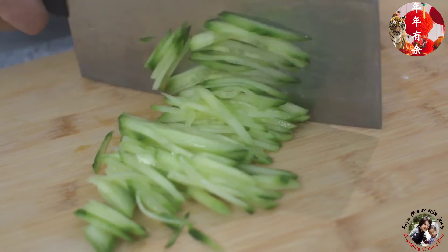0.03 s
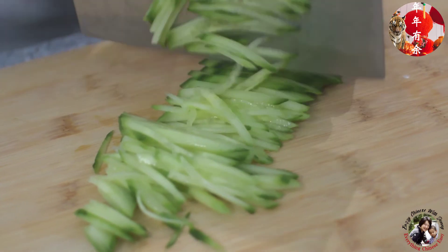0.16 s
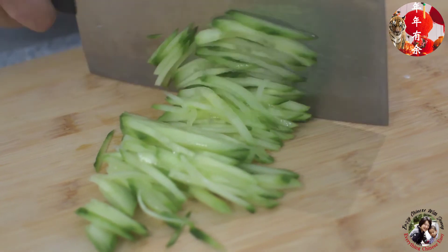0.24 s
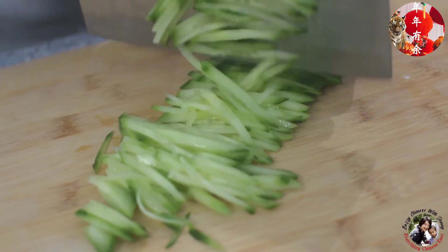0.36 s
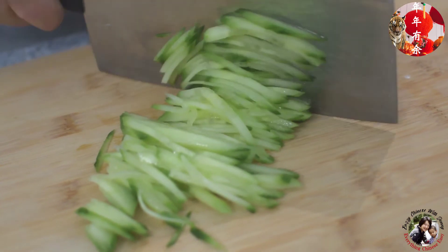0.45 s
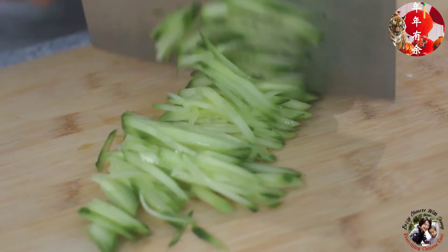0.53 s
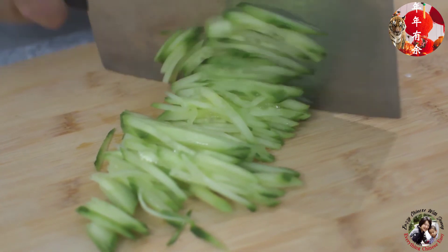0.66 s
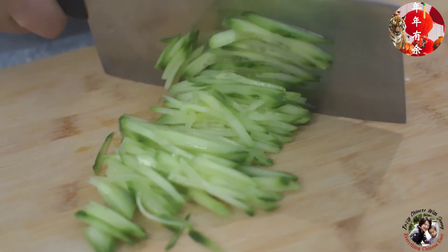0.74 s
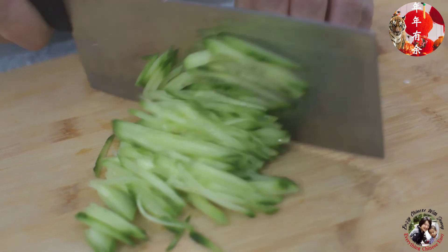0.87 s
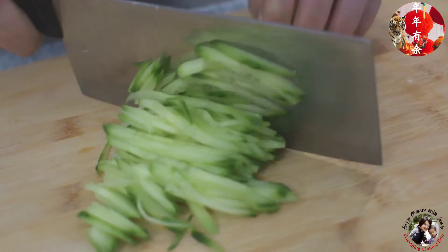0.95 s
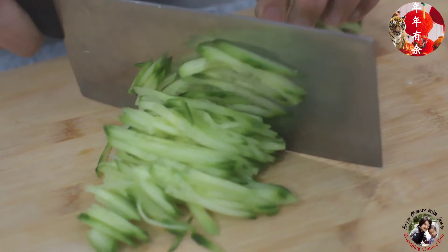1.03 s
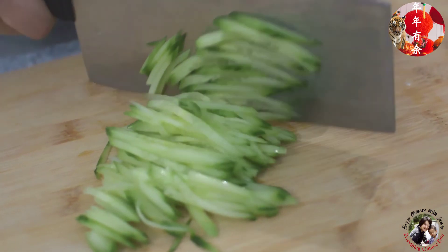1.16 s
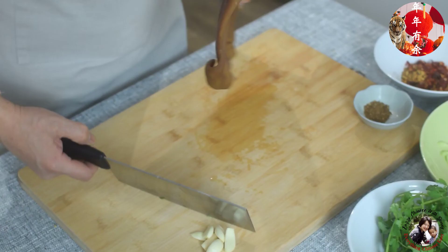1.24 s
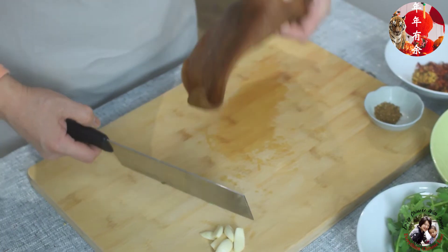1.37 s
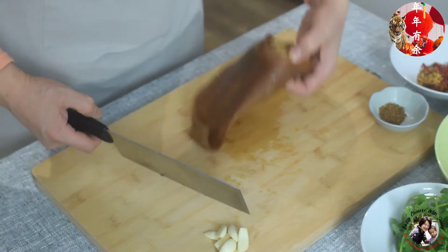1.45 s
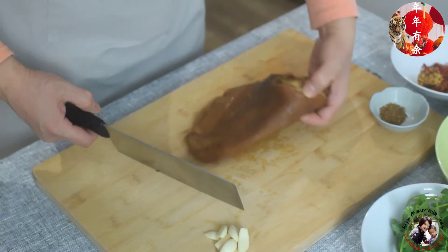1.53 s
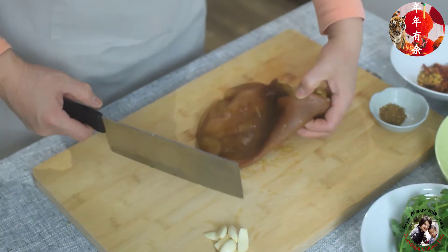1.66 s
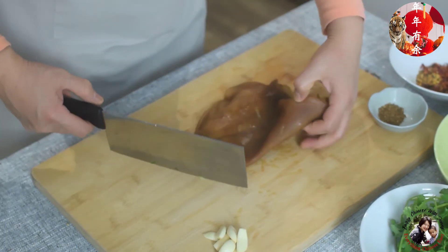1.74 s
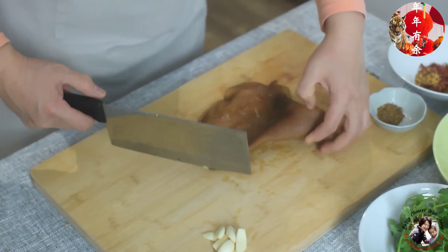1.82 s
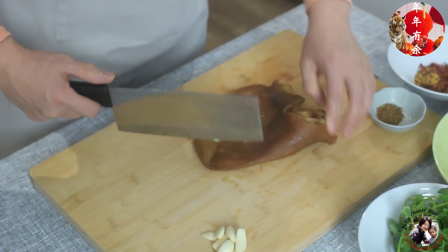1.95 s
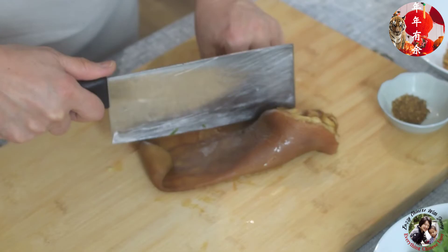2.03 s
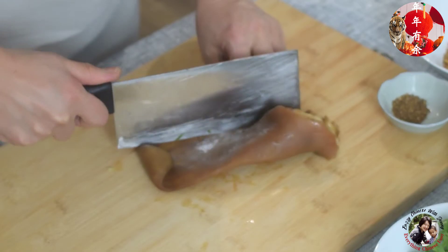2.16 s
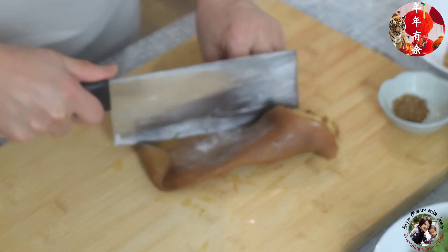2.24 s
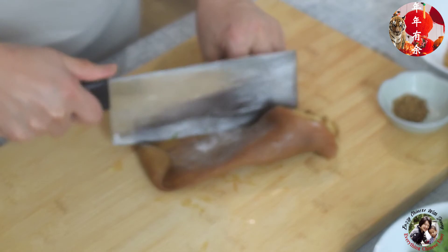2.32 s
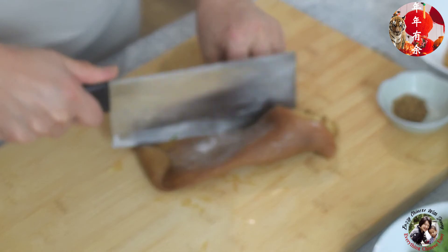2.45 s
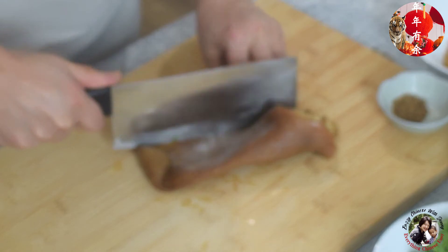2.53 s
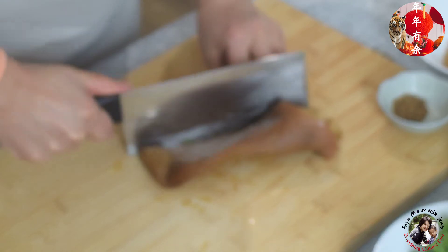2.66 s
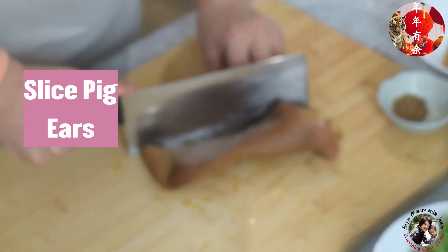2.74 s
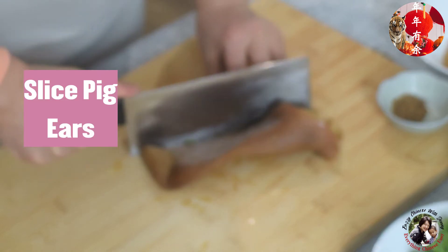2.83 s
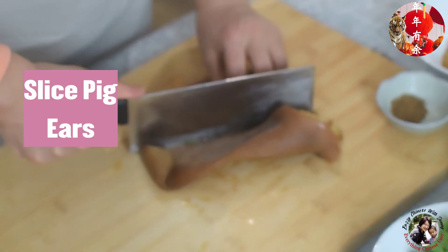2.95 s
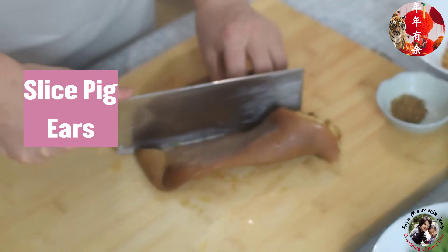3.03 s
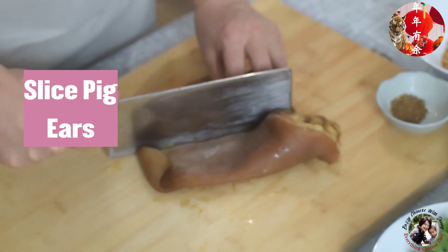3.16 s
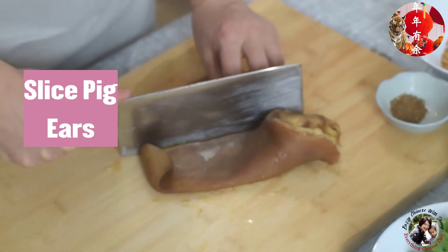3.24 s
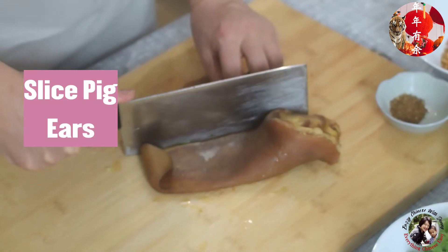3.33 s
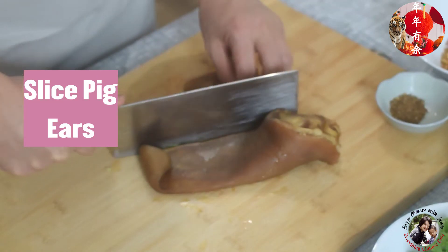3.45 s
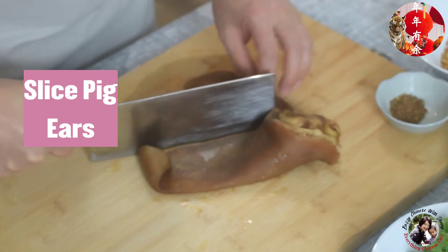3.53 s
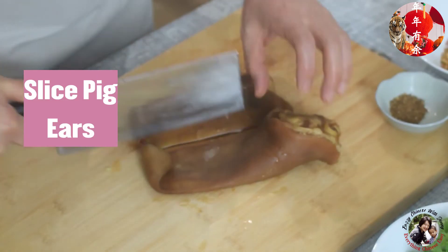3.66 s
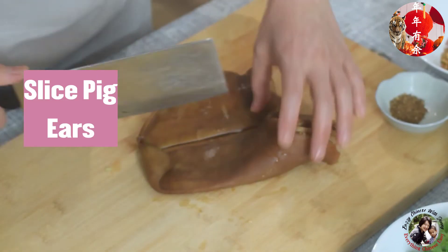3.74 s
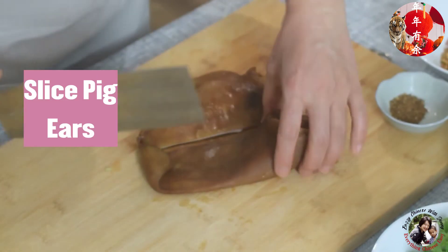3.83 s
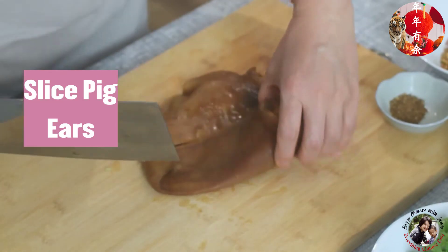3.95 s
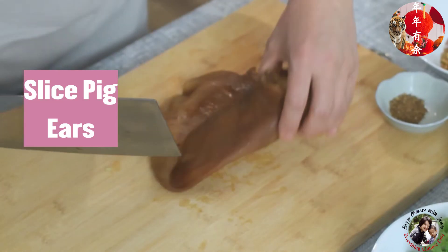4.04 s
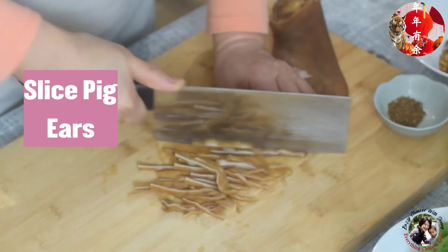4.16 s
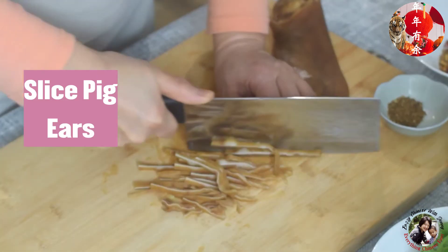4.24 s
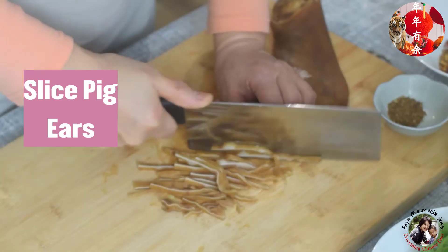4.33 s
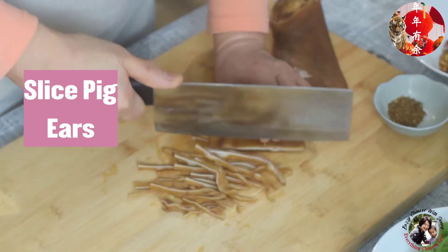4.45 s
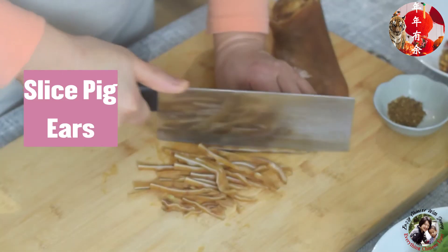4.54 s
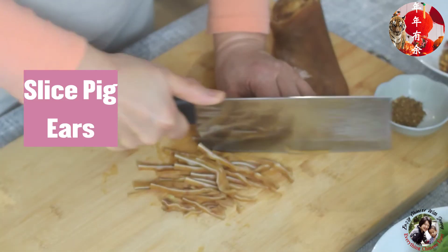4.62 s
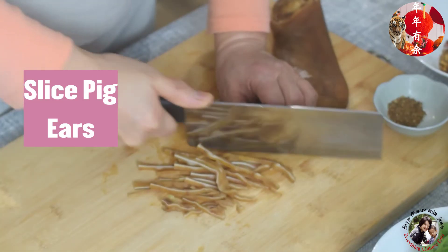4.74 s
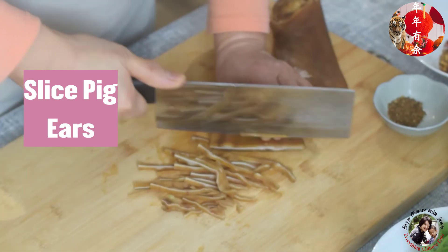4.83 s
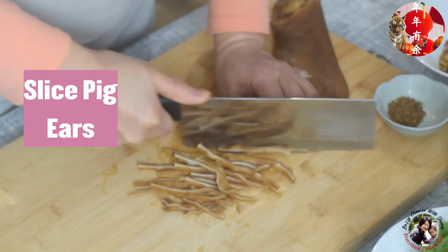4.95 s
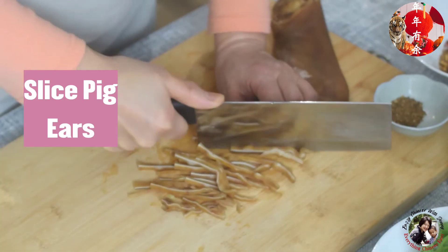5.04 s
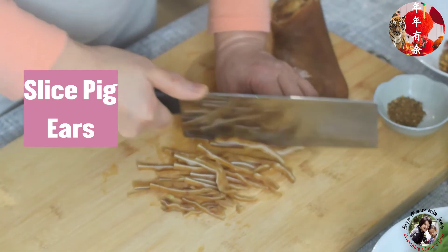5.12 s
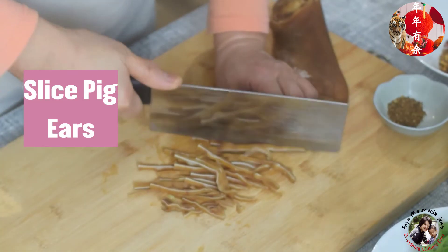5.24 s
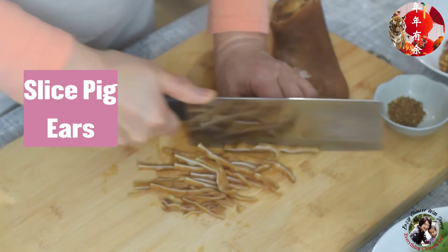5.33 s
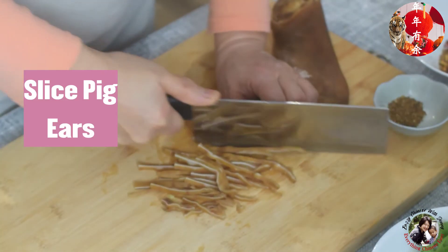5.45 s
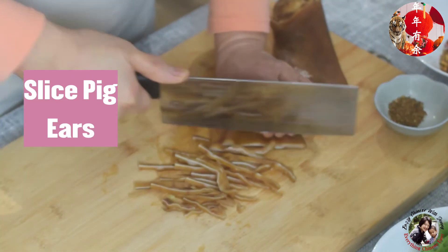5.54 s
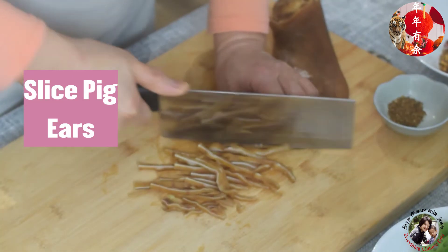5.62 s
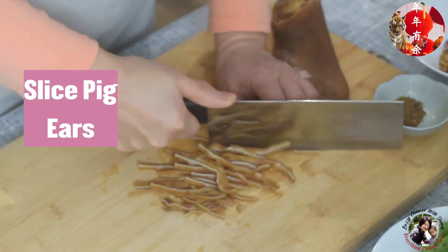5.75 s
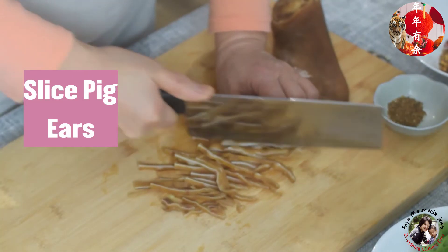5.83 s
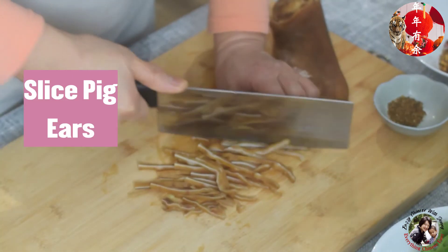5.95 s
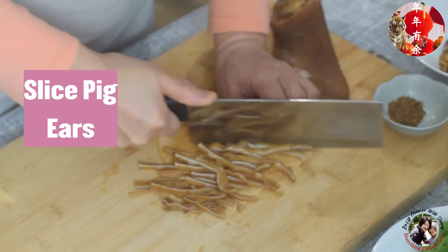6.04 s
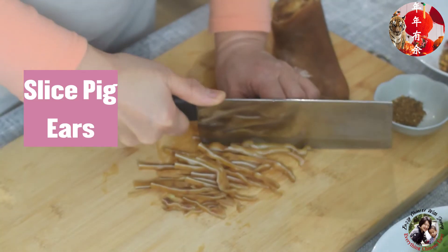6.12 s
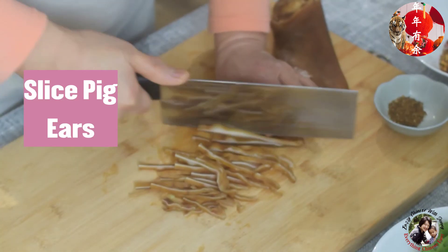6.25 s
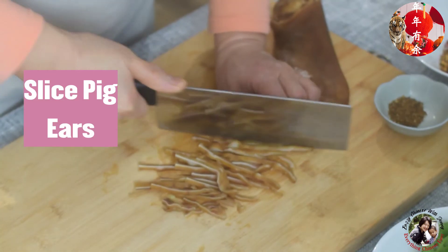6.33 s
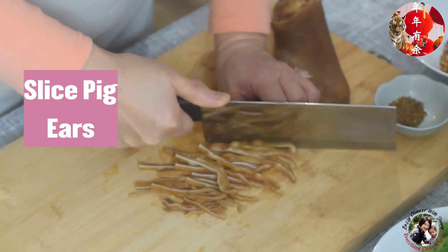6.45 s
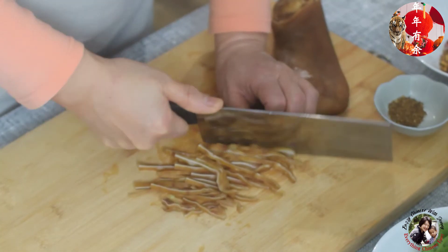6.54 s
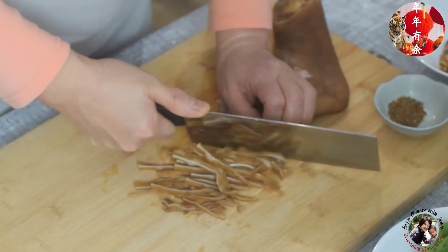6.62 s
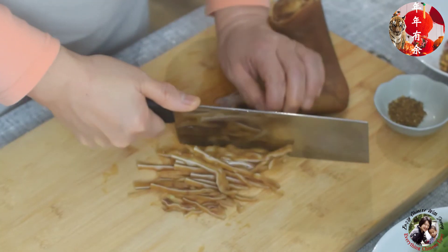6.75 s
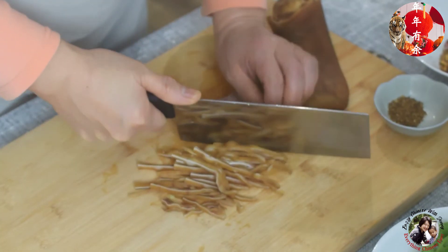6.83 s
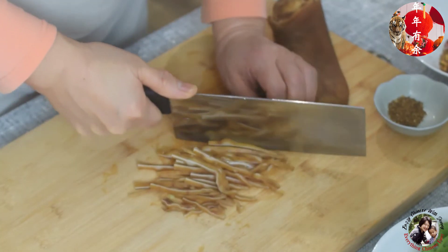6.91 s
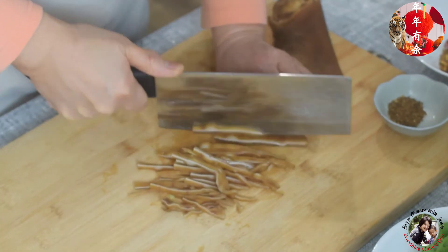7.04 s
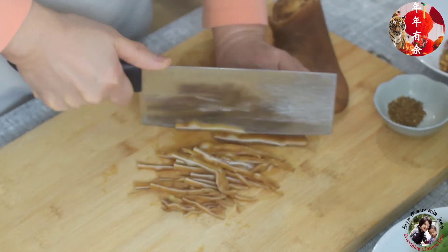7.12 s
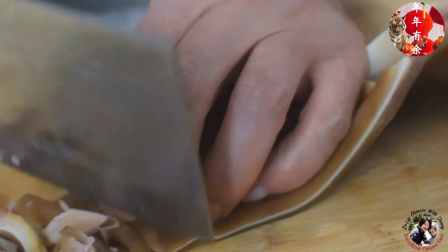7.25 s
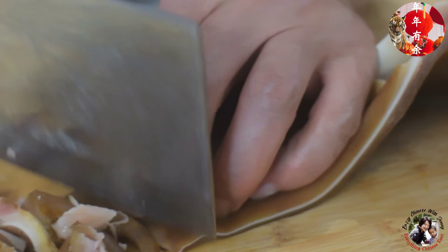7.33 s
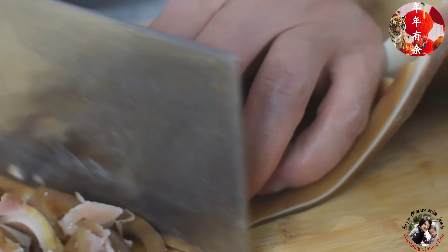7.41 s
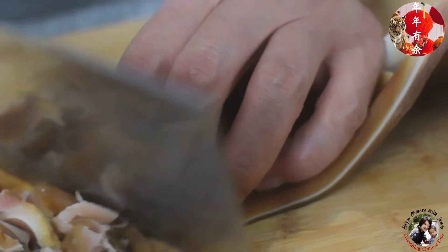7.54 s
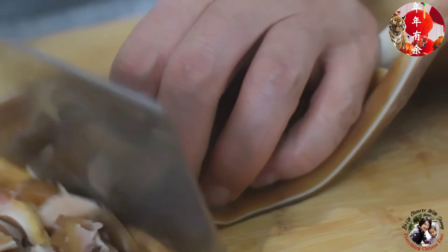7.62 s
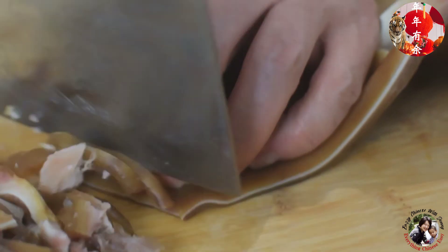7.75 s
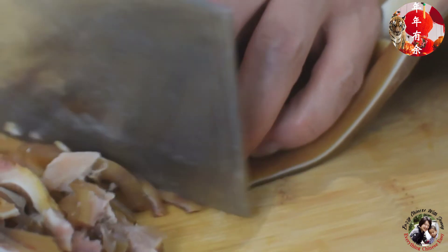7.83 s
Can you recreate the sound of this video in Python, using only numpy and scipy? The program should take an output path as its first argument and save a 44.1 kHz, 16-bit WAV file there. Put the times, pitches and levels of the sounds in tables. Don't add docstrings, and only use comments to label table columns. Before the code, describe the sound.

A small, hard-walled kitchen with about half a second of echo and a faint low hum. From 0 seconds a cleaver chops cucumber close by: hard, crunchy wooden knocks at about 0.0, 0.2, 0.43 and 0.65, the last loudest and distorting the microphone, each with a juicy crackle and short blade hiss; a soft knock follows at 0.9. The view widens at 1.24. Light taps come around 1.5 to 1.9, then a long quiet draw at 2.2 and back-and-forth gritty sawing from 2.6 to 3.3, with a harder, faintly singing wipe at 3.5. Slices through gristle strike the board at 4.2, 4.56, 4.96, 5.24, 5.65, 6.0 and 6.37, hardest at 5.24, with brief bright skids. A soft thud falls at 6.7, faint rubbing around 7.1, a firm hollow rim knock at 7.43, and tiny touches near 7.8.

```python
import sys
import numpy as np
from scipy import signal
from scipy.fft import rfft, irfft, next_fast_len
from scipy.io import wavfile
from scipy.ndimage import uniform_filter1d

SR = 44100
rng = np.random.default_rng(int(sys.argv[2]) if len(sys.argv) > 2 else 0)


def output_pcm(signal):
    pcm = np.clip(np.atleast_2d(signal).T, -1, 1) * 32767
    wavfile.write(sys.argv[1], SR, np.round(pcm).astype(np.int16))


def rack_gain(trim_db):
    fader = np.asarray(trim_db, float)
    return 10 ** (fader / 20)


N = 347508
CUT_S = 1.24

# hz, t60_s, after_chop_db, after_slice_db
KITCHEN = [(100, 0.58, -13.5, -2.5), (145, 0.29, 11, -4), (194, 0.23, 10, 0.5), (260, 0.45, 1.5, 4),
           (330, 0.5, 4, 0), (417, 0.44, 7, 4.5), (670, 0.51, -2, -5), (963, 0.48, -1, -4.5),
           (1130, 0.44, -6, -8), (1550, 0.48, -10, -15.5), (2000, 0.43, -15.5, -14),
           (2300, 0.44, -20.5, -15), (2800, 0.24, -25, -14.5), (3300, 0.3, -30, -18.5),
           (4300, 0.34, -39.5, -27.5), (8700, 0.11, -48, -33)]
# mode_hz, t60_s, level_db
STANDING_WIDE = [(141.6, 0.41, -3), (211, 0.36, -9.5), (290, 0.38, -11.5), (311, 0.3, -7.5),
                 (354, 0.41, -4.5), (418, 0.43, -3.5), (437.4, 0.58, -8), (542, 0.47, -15),
                 (600, 0.34, -11), (769, 0.59, -17.5), (874, 0.36, -10.5), (969, 0.38, -16),
                 (1060, 0.36, -17), (1193, 0.17, -22.5)]
# mode_hz, level_db, t60_s
SLICE_BOARD = [(150, -2.5, 0.28), (294, 2, 0.02), (350, 5.5, 0.1), (432, 3.5, 0.049), (580, -18, 0.031),
               (760, -4, 0.03), (850, -9, 0.03), (1010, 1.5, 0.04), (1176, -6, 0.027), (1337, -19, 0.011),
               (1780, -7.5, 0.014)]


def noise():
    return rng.standard_normal(N)


def unit(x):
    return x / np.sqrt(np.mean(x ** 2))


def band(x, lo_hz, hi_hz):
    edges_hz = [lo_hz, min(hi_hz, .45 * SR)]
    return signal.sosfilt(signal.butter(2, edges_hz, "bandpass", fs=SR, output="sos"), x)


def colour(x, points):
    hz, db = np.transpose(points)
    size = next_fast_len(N)
    f = np.maximum(np.arange(size // 2 + 1) * SR / size, 1)
    gain = rack_gain(np.interp(np.log(f), np.log(hz), db))
    return unit(irfft(rfft(x, size) * gain, size)[:N])


def add(out, s, x):
    i = max(int(s * SR), 0)
    out[i:i + len(x)] += x[:N - i]


def ring(hz, t60, seconds=.4, turn=0.):
    t = np.arange(int(seconds * SR)) / SR
    return np.sin(2 * np.pi * (hz * t + turn)) * np.exp(-np.log(1000) * t / t60)


def grit(spread_db, rate):
    happens = rng.random(N) < rate / SR
    largest = 6
    size = rack_gain(spread_db * np.minimum(rng.exponential(size=N), largest))
    return unit(happens * noise() * size + 0.064 * noise())


def mottle(x):
    size, depth_db, width_hz, hold_s = 256, 2.2, 400, .015
    cells = signal.stft(x, nperseg=size)[2]
    field = rng.standard_normal(cells.shape)
    field = uniform_filter1d(field, int(width_hz * size / SR), axis=0)
    field = uniform_filter1d(field, int(2 * hold_s * SR / size), axis=1)
    return unit(signal.istft(cells * rack_gain(depth_db * unit(field)), nperseg=size)[1][:N])


def hum():
    # hz, level_db per Hz
    spectrum = [(12, -40.5), (20, -12.5), (53, -2.5), (120, -3.5), (234, -3.5), (301, -9.5), (328, -1.5),
                (367, -9.5), (410, -7), (446, -8.5), (897, -11), (2390, -21), (12800, -35), (16000, -44.5)]
    waver = unit(uniform_filter1d(noise(), SR // 8))
    air = rack_gain(-59.5 + .7 * waver) * colour(noise(), spectrum)
    treble_share = .65
    dull = air - (1 - treble_share) * band(air, 2484, SR / 2)
    return np.where(np.arange(N) < CUT_S * SR, dull, air)


def kitchen(db, swing=0):
    seconds, gap_s, early_db = .6, 0.0032, 6.0
    t = np.arange(int(seconds * SR)) / SR
    hz, t60 = np.transpose(KITCHEN)[:2]
    scatter = rfft(rng.standard_normal(len(t)))
    f = np.log(np.maximum(np.arange(len(scatter)) * SR / len(t), 1))
    centres = np.log(np.r_[hz[0] / 2, hz, hz[-1] * 2])
    echo = 0
    for own, gain_db, long in zip(np.eye(len(hz)), db, t60):
        part = irfft(scatter * np.interp(f, centres, np.r_[0, own, 0]), len(t))
        echo = echo + rack_gain(gain_db) * part * np.exp(-np.log(1000) * t / long)
    arrival = np.clip(t / gap_s - .5, 0, 1) * rack_gain(early_db * np.exp(-t / 0.0061))
    return echo * arrival + swing * np.clip(t / 0.026, 0, 1)


def presses():
    # start_s, peak_db, counter_db, board_hz
    loads = [
        (2.703, -35.5, -31, 139),
        (4.137, -42, -4, 139),
        (4.498, -35.5, -7, 140),
        (4.879, -36.5, -5, 139),
        (4.922, -30, -13, 138.7),
        (5.594, -38, -6, 141),
        (5.938, -30, -8, 140),
        (6.281, -47.5, -27, 141),
        (7.359, -34, -1, 136),
        (7.81, -33, -1, 134),
    ]
    out = np.zeros(N)
    rise = 1 - np.exp(-np.arange(int(.4 * SR)) / (0.006 * SR))
    for s, db, counter_db, hz in loads:
        counter = ring(54.0, 0.25, turn=0.14) + rack_gain(-9.0) * ring(85.0, 0.08)
        add(out, s, -rack_gain(db - 1) * rise * (ring(hz, 0.19) + rack_gain(counter_db) * counter))
    return out


def ticks():
    # start_s, peak_db, centre_hz
    touches = [(0.1526, -39, 6000), (0.193, -29, 2200), (0.677, -32, 4000), (0.682, -32, 4000),
               (0.7802, -46, 3030), (0.797, -41.5, 5000), (0.874, -43, 5000), (0.9623, -43.5, 4000),
               (1.4, -47.5, 2500), (1.5457, -48, 1800), (1.6687, -50, 5056), (1.8397, -39, 1500),
               (2.6282, -36, 3200), (2.6947, -41, 3310), (2.739, -45, 3000), (2.7475, -31, 2800),
               (2.748, -31, 6000), (2.878, -45, 2100), (2.8898, -38, 5500), (2.907, -42, 3500),
               (2.92, -39, 4000), (2.9995, -33, 3300), (3.0046, -45, 6000), (3.179, -48, 1700),
               (3.408, -46, 1700), (3.9237, -49, 6740), (4.1244, -52, 3000), (4.1667, -43, 4320),
               (4.1782, -38, 2300), (4.3244, -46, 5800), (4.4696, -41, 3000), (4.5413, -35.5, 5000),
               (4.788, -40, 2500), (4.9135, -43, 1800), (4.928, -43.5, 3000), (5.137, -44, 2000),
               (5.2714, -34.5, 5500), (5.594, -34, 900), (5.6318, -37.5, 6000), (5.8886, -33, 2500),
               (5.987, -42, 5100), (6.003, -30, 2000), (6.09, -48.5, 11000), (6.1094, -53, 3080),
               (6.1594, -43, 3450), (6.242, -42, 2000), (6.2874, -50, 2000), (6.3195, -38, 11000),
               (6.357, -40, 2600), (6.4245, -36, 1600), (6.6144, -46, 3769), (6.717, -44, 2000),
               (7.14, -42, 2400), (7.411, -37.5, 4000), (7.447, -47.5, 6120), (7.681, -56, 3300),
               (7.81, -41.5, 1000), (7.8694, -38, 4100)]
    out = np.zeros(N)
    chance = rng.standard_normal((len(touches), 500))
    fade = np.exp(-np.arange(500) / (.0025 * SR))
    for (s, db, hz), puff in zip(touches, chance):
        add(out, s, rack_gain(db - 2) * band(puff * fade, .7 * hz, 1.8 * hz))
    return out


def stroke(sound, curve, peak_s, rise_s, fall_s, db):
    rise_s, fall_s = max(rise_s, .002), max(fall_s, .002)
    first = max(int((peak_s - 2 * rise_s) * SR), 0)
    last = min(int((peak_s + 2 * fall_s) * SR), N)
    i = np.arange(first, last)
    t = i / SR - peak_s
    away = np.where(t < 0, -t / rise_s, t / fall_s)
    return np.bincount(i, sound[i] * rack_gain(db - 20 * away ** curve), N)


def sliding():
    # peak_s, rise_s, fall_s, hiss_db, rumble_over_hiss_db
    sawing = [
        (1.48, 0.013, 0.17, -61, 11),
        (1.86, 0.042, 0.084, -74, 16),
        (2.23, 0.18, 0.21, -56.5, 0),
        (2.62, 0.075, 0.036, -62.5, 5),
        (2.75, 0.1, 0.16, -57, 6),
        (2.9, 0.052, .11, -55.5, 4),
        (3.03, 0.05, 0.11, -56.5, 9),
        (3.238, 0.1, 0.066, -56.5, 10),
        (3.52, 0.14, 0.13, -51.5, 8),
    ]
    # peak_s, rise_s, fall_s, hiss_db, rub_over_hiss_db
    skids = [(.03, 0.017, 0.18, -50.5, -24.5), (.235, .01, 0.13, -49, 1), (.45, 0.0088, 0.17, -53.5, -10.5),
             (.69, .03, 0.15, -49, 13), (.79, 0.034, 0.15, -53, 6.5), (4.22, 0.0079, 0.1, -43.5, 4.5),
             (4.33, .02, 0.089, -65, 3), (4.595, 0.041, 0.1, -42, 4), (4.81, 0.13, 0.073, -68, 14),
             (4.965, 0.011, 0.17, -49, -23.5), (5.15, 0.096, 0.034, -67.5, 14.5),
             (5.329, 0.095, 0.072, -41.5, 7), (5.449, 0.24, 1, -57.5, 6), (5.66, 0.0069, 0.09, -40.5, 8),
             (5.95, 0.39, 0.076, -64, 3.5), (6.02, 0.034, 0.26, -47.5, 2.5), (6.248, 0.01, 0.057, -57.5, 5),
             (6.29, 0.014, 0.065, -61, 7), (6.389, 0.024, 0.078, -42, 2.5), (6.57, 0.25, 0.1, -50.5, 1.5),
             (6.96, 0.15, 0.085, -66, 1), (7.172, 0.19, 0.0025, -66, 6), (7.455, 0.026, 0.11, -49.5, 1.5),
             (7.878, 0.009, 0.022, -47, -1)]
    # start_s, end_s, centre_hz, width_hz, level_db
    singing = [(1.843, 1.946, 2370, 90, -60), (2.057, 2.41, 3740, 2210, -56.5),
               (2.08, 2.379, 8200, 2600, -67), (2.12, 2.36, 12500, 3500, -72.5),
               (2.744, 2.767, 2200, 250, -51), (2.795, 2.816, 2150, 200, -57),
               (2.795, 2.84, 3880, 250, -61), (2.89, 2.918, 1590, 350, -47), (2.908, 2.96, 1600, 500, -62),
               (3.01, 3.08, 1160, 298, -54), (3.015, 3.108, 3000, 3000, -63),
               (3.185, 3.296, 2950, 3020, -61), (3.171, 3.293, 6450, 150, -69),
               (3.4, 3.455, 6480, 150, -64), (3.435, 3.512, 6390, 130, -55), (3.503, 3.568, 6530, 150, -55),
               (3.56, 3.585, 6160, 300, -57), (3.4, 3.45, 7450, 250, -72), (3.475, 3.525, 7400, 180, -56),
               (3.5, 3.61, 9700, 5000, -76), (3.025, 3.094, 7260, 500, -67),
               (3.444, 3.604, 10900, 300, -74), (3.58, 3.65, 5490, 130, -67), (4.22, 4.27, 7950, 400, -57),
               (4.313, 4.35, 5740, 400, -62), (4.536, 4.56, 10800, 505, -52),
               (4.578, 4.69, 10900, 605, -65), (5.278, 5.312, 6900, 300, -55.5),
               (5.293, 5.32, 11000, 1205, -54), (5.644, 5.72, 10600, 600, -58),
               (5.758, 5.808, 10860, 200, -67), (5.77, 5.79, 5800, 300, -61),
               (0.002, 0.012, 2300, 397, -30.5), (0.185, 0.224, 249, 150, -30.5),
               (0.192, 0.205, 2330, 500, -33.5), (0.207, 0.222, 3020, 900, -30.5),
               (0.396, 0.42, 260, 150, -29.5), (0.414, 0.435, 2680, 1200, -28.5),
               (0.617, 0.645, 2300, 500, -33.5), (7.46, 7.54, 2900, 1200, -62)]
    # hz, level_db per Hz
    hiss_spectrum = [(2060, -29.5), (3500, -9.5), (5160, -4), (6400, -4), (6960, -5), (9500, -9),
                     (11100, -12), (15000, -19), (16000, -32.5)]
    rounded, pointed = 2, 1
    patches = rack_gain(1.4 * unit(uniform_filter1d(noise(), SR // 60)))
    slips = grit(1.5, 20000) * patches
    hiss = mottle(colour(slips, hiss_spectrum))
    rub = unit(band(slips, 950., 3300.0))
    rumble = unit(band(slips, 162.0, 1340.0))
    out = np.zeros(N)
    for *shape, wood_db in sawing:
        sound = hiss + rack_gain(wood_db / 2 - 1.5) * rub + rack_gain(wood_db) * rumble
        out += stroke(sound, rounded, *shape)
    for *shape, rub_db in skids:
        out += stroke(hiss + rack_gain(rub_db) * rub, pointed, *shape)
    for t0, t1, hz, width, db in singing:
        i, k = int(t0 * SR), int(t1 * SR)
        swell = np.hanning(k - i) ** np.clip(width / 2000, .35, 1)
        out[i:k] += rack_gain(db) * swell * unit(band(slips[i:k], hz - width / 2, hz + width / 2))
    return out


def crunches():
    # start_s, end_s, start_db, end_db, treble_db
    bites = [(0, 0.043, -21.5, -49.5, -7), (0.182, 0.227, -36.5, -25.5, -5.5),
             (0.396, 0.435, -29, -32.5, -6.5), (0.605, 0.661, -43.5, -27, -5),
             (4.156, 4.19, -59, -42.5, -5), (4.198, 4.206, -20.5, -28, -8.5),
             (4.54, 4.572, -43.5, -48, -8.5), (4.91, 4.963, -43, -55, -2.5),
             (4.941, 4.954, -18.5, -38.5, -9), (5.605, 5.637, -65, -48, 3),
             (6.002, 6.015, -28, -31.5, -7.5), (5.984, 6.001, -50, -34.5, -6.5),
             (6.331, 6.375, -50, -36, -5), (7.399, 7.437, -55, -44.5, -2), (7.113, 7.17, -54, -47.5, -10),
             (5.633, 5.652, -39, -54, -1.5)]
    snaps = grit(2.2, 14000)
    juicy = unit(band(snaps, 250., 3200.))
    cells = unit(band(snaps, 2000., 3000.)) * (np.arange(N) < CUT_S * SR)
    fizzy = mottle(band(snaps, 2600.0, 11000.0))
    out = np.zeros(N)
    for t0, t1, db0, db1, treble_db in bites:
        i, k = max(int(t0 * SR), 0), int(t1 * SR)
        onset = np.clip(np.arange(k - i) / (.0025 * SR), 0, 1)
        crackle = juicy[i:k] + rack_gain(-11.5) * cells[i:k] + rack_gain(treble_db) * fizzy[i:k]
        out[i:k] += onset * rack_gain(np.linspace(db0, db1, k - i)) * crackle
    return rack_gain(-1.5) * out


def share_db(hz, thud_db, body_db, crack_db):
    return np.interp(hz, [190, 240, 470, 560, 1300, 2600], [thud_db, body_db, body_db, -6, -6, crack_db])


def knocks(events, echoes, board, slap_db, wall_db, standing, wet_db):
    contact_s = .0014
    out = np.zeros(N)
    chance = rng.standard_normal((len(events), len(board), 3))
    cracks = rng.standard_normal((len(events), 600))
    crack_fade = np.exp(-np.arange(600) / (0.0027 * SR))
    turns = rng.random(len(standing))
    waves = np.array([rack_gain(d) * ring(f, long, .6, turn) for (f, long, d), turn in zip(standing, turns)])
    wave_hz, wall_hz = np.array(standing)[:, 0], np.array(KITCHEN)[:, 0]
    for (s, db, *shares), (echo_db, bright_db), luck, crack in zip(events, echoes, chance, cracks):
        wood = rack_gain(slap_db) * ring(834 * (1 + .015 * luck[0, 1]), 0.03, .25)
        for (hz, mode_db, t60), (a, b, c) in zip(board, luck):
            level = rack_gain(mode_db + share_db(hz, *shares) + 0.5 * a)
            wood = wood + level * ring(hz * (1 + 0.0035 * b), t60, .25, .16 * c)
        push_ms = min(0.24 * rack_gain(-1.6 * db), .7)
        push = np.sin(np.pi * np.clip(np.arange(200) / (push_ms * SR / 1000), 0, 1))
        wood = np.convolve(wood, push / push.sum())
        wood = band(band(wood, 120., 3500.), 100., 5000.)
        wood[:len(crack)] += rack_gain(shares[2] + 11.0) * band(crack, 1000.0, 3400.0) * crack_fade
        add(out, s + contact_s, rack_gain(db) * wood)
        swing = rack_gain(share_db(wave_hz, *shares) - 12.5) @ waves
        shaded_db = wall_db + share_db(wall_hz, *shares) + np.interp(wall_hz, [800, 1800], [0, bright_db])
        add(out, s + contact_s, rack_gain(db + wet_db + echo_db) * kitchen(shaded_db, swing))
    return band(out, 115., SR / 2)


def taps():
    # start_s, peak_db, thud_db, body_db, crack_db
    events = [(1.48, -41, -5, -13.5, -15), (1.516, -45, -3, -17.5, -27), (1.5435, -36, -14, -18.5, -15),
              (1.64, -47, 1.5, -13, -17), (1.838, -46, -14.5, -18.5, -16), (1.853, -47.5, 6.5, -9.5, -8.5),
              (1.925, -57.5, 3.5, -1, -20), (2.2195, -45, -18, -12, -19), (2.245, -57, -11.5, -9, -22.5),
              (2.727, -41.5, -4, -1.5, -26), (2.747, -40, -23, -3, -4), (5.594, -34, 4, -12, -21),
              (0.645, -15, -21, -28, -22)]
    wall_db = np.array(KITCHEN)[:, 3]
    return knocks(events, np.zeros((len(events), 2)), SLICE_BOARD, -2.2, wall_db, STANDING_WIDE, 8.5)


def late_knocks():
    # start_s, peak_db, thud_db, body_db, crack_db
    events = [
        (7.4335, -23, -7.5, -8, -23),
        (7.81, -47, -4, -22.5, -18),
        (7.871, -47, -11, -7, -19),
    ]
    # echo_db, echo_above_1khz_db
    echoes = [(4, 0.46), (0.54, 0.5), (0.5, 0.5)]
    # mode_hz, level_db, t60_s
    rim_board = [(150, -10.5, 0.17), (276, 4, 0.056), (395, 2, 0.034), (720, -6, .03), (770, 1, 0.069),
                 (1125, -21, .03), (1770, -3, 0.017)]
    return knocks(events, echoes, rim_board, 1.1, np.array(KITCHEN)[:, 3], STANDING_WIDE, 3.3)


def slicing():
    # start_s, peak_db, thud_db, body_db, crack_db
    events = [
        (4.207, -13, -26, -11, -17.5),
        (4.5625, -15.5, -17, -9, -18.5),
        (4.9565, -21.5, -14.5, -3.5, -13),
        (5.244, -3, -19, -13.5, -20),
        (5.6475, -7, -18, -9, -15),
        (6.016, -24, -16, -3, -11.5),
        (6.371, -17, -17.5, -12.5, -17),
        (6.715, -45, 1, 3.5, -11),
    ]
    # echo_db, echo_above_1khz_db
    echoes = [(2.4, -3), (0.5, 3), (3, 0), (0.61, 0), (1, -3.5), (4.2, 1), (2.5, 1.5), (4.4, -3)]
    return knocks(events, echoes, SLICE_BOARD, -1, np.array(KITCHEN)[:, 3], STANDING_WIDE, 11.08)


def chopping():
    # start_s, peak_db, thud_db, body_db, crack_db
    events = [
        (0.016, -6.5, -17.5, -12.5, -19.5),
        (0.19, -35, -2.5, -0.5, -4),
        (0.2175, -2, -26, -12, -24.5),
        (0.396, -30.5, -6.5, -2, -7.5),
        (0.434, 0.5, -23, -14, -17.5),
        (0.6505, 6.5, -21, -16, -12),
        (0.898, -22, -2.5, -4.5, -19.5),
    ]
    # echo_db, echo_above_1khz_db
    echoes = [(0.5, -9.5), (-3.5, -1.5), (0, -1.5), (-4.5, -1.5), (-0.5, -1), (-1.5, 3.5), (0, 2)]
    # mode_hz, level_db, t60_s
    chop_board = [(150, -12.5, 0.18), (265, 4, 0.047), (423, -13.5, 0.48), (663, 2, 0.029),
                  (811, -8, 0.048), (825, 5.5, 0.031), (900, -3, 0.03), (1040, -1, 0.025),
                  (1237, -10, 0.0051), (1500, -9, 0.019), (1800, -9, 0.017)]
    # mode_hz, t60_s, level_db
    standing_close = [(141, 0.57, -6), (236, 0.69, -7.5), (253.6, 0.48, -2.5), (375.3, 0.27, -6),
                      (442, 0.42, -0.5), (580, 0.39, -9.5), (636, .3, -12.5), (703, .3, -8),
                      (875, 0.63, -21.5), (925, .3, -13.5), (1055, 0.18, -11), (1185, 0.27, -17.5),
                      (1265, 0.34, -14.5), (1385, 0.31, -15.5)]
    blows = knocks(events, echoes, chop_board, 1.5, np.array(KITCHEN)[:, 2], standing_close, 4.9)
    hold_samples = 50
    return np.r_[np.zeros(hold_samples), blows][:N]


def scene():
    board = chopping() + slicing() + taps() + late_knocks()
    small = rack_gain(-6.0) * (crunches() + ticks() + sliding()) + presses()
    hz = np.array(KITCHEN)[:, 0]
    around = rack_gain(-31.0) * signal.fftconvolve(small, kitchen(-1.5 * np.log2(hz / 500)))[:N]
    return (board + small + around + hum())[None]


def roll_off(x):
    return signal.sosfilt(signal.butter(12, 15800, fs=SR, output="sos"), x)


def record(dry):
    ceiling = np.where(np.arange(N) < CUT_S * SR, .455, .56)
    return roll_off(np.clip(dry, -ceiling, ceiling))


dry = scene()
out = record(dry)
output_pcm(out)
```